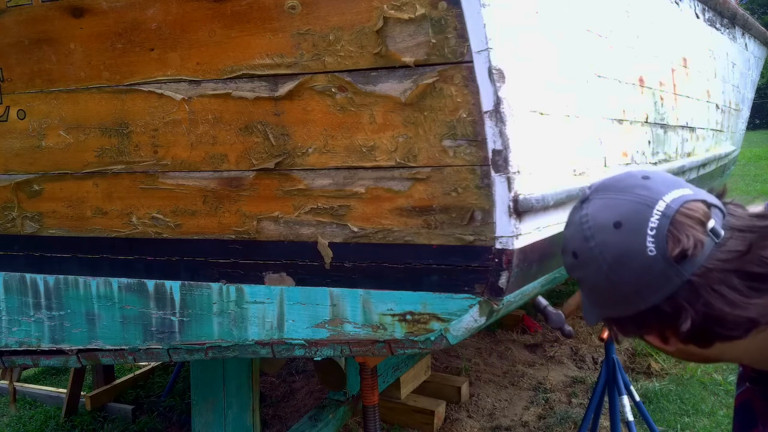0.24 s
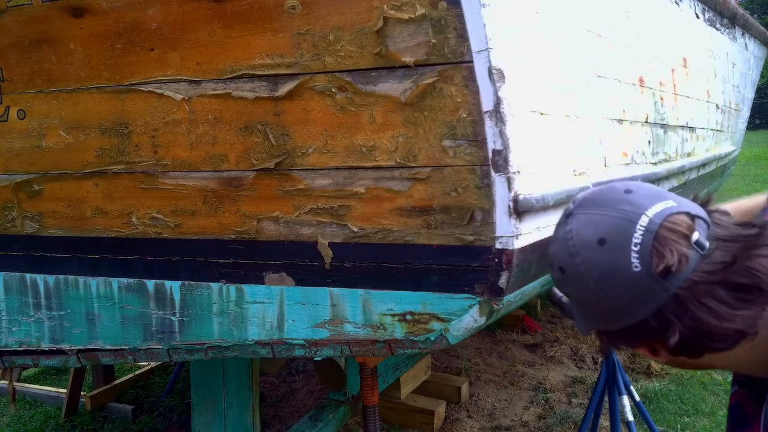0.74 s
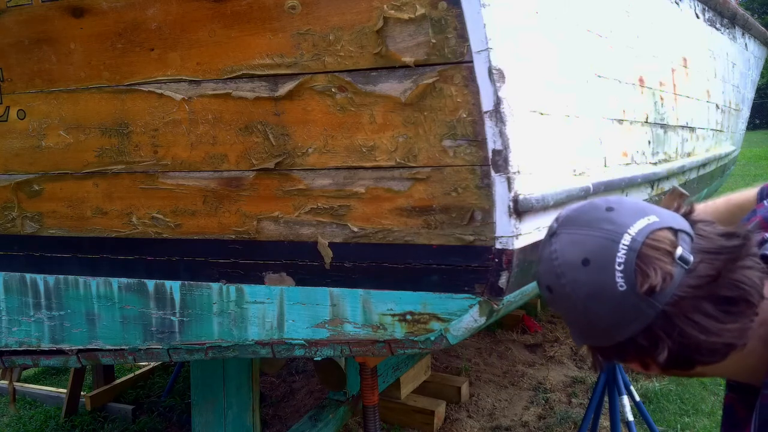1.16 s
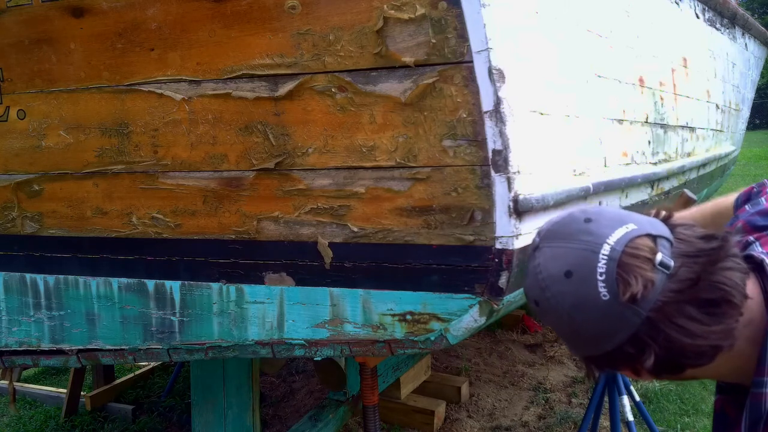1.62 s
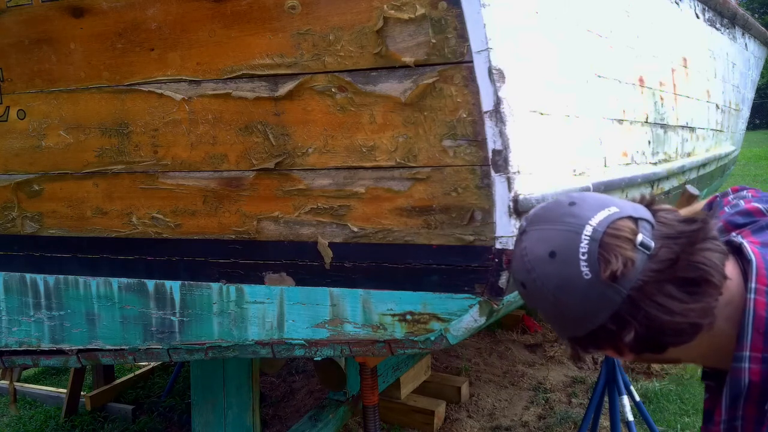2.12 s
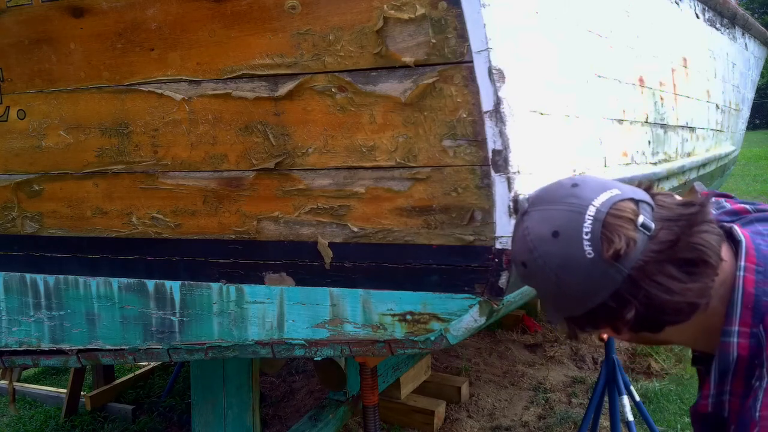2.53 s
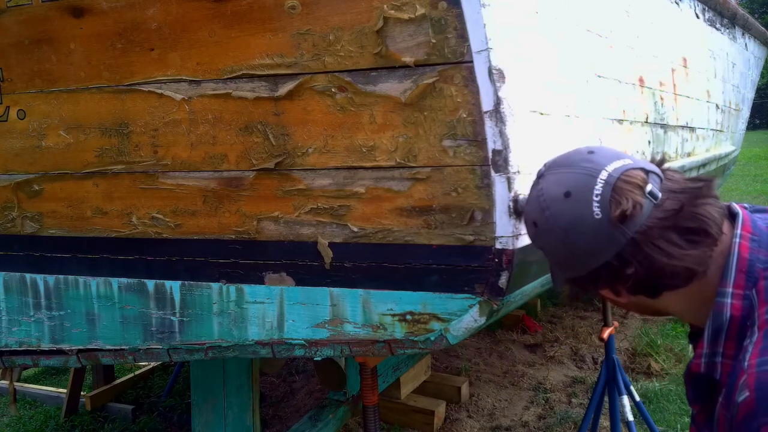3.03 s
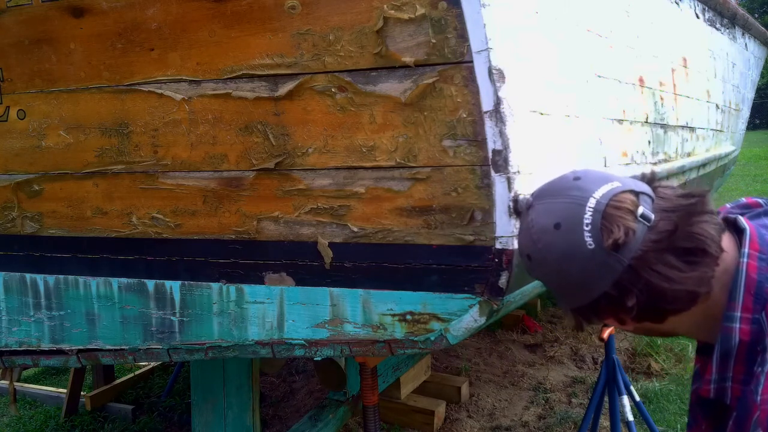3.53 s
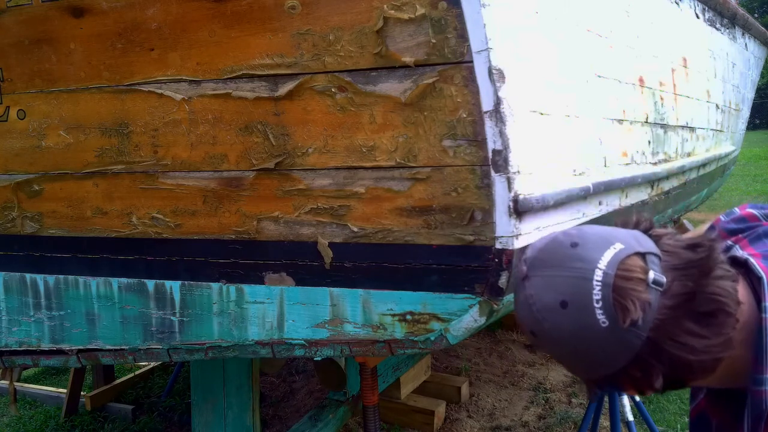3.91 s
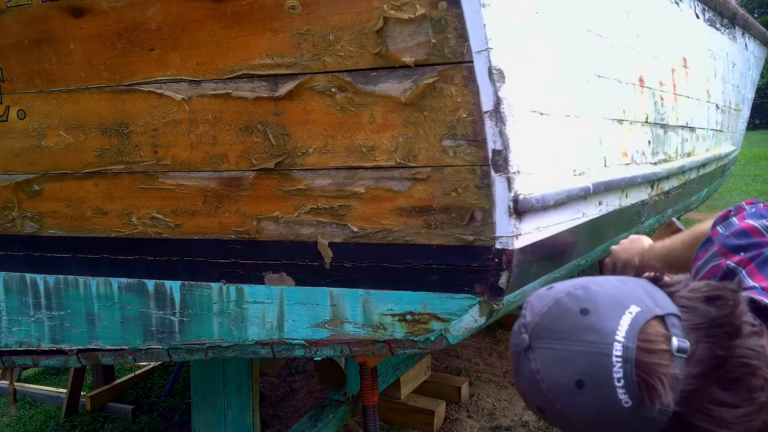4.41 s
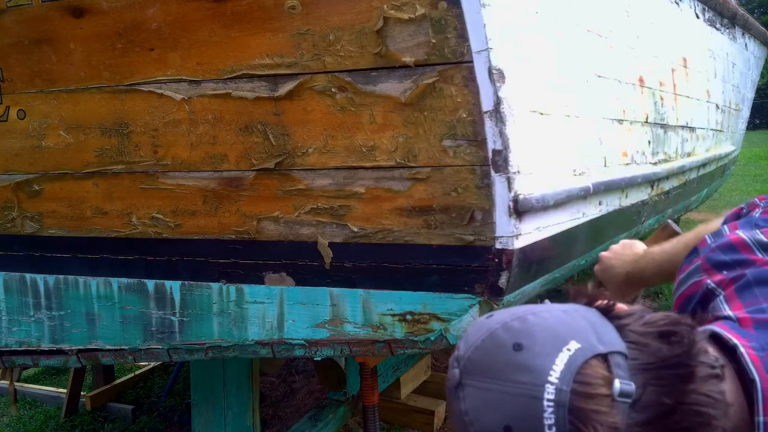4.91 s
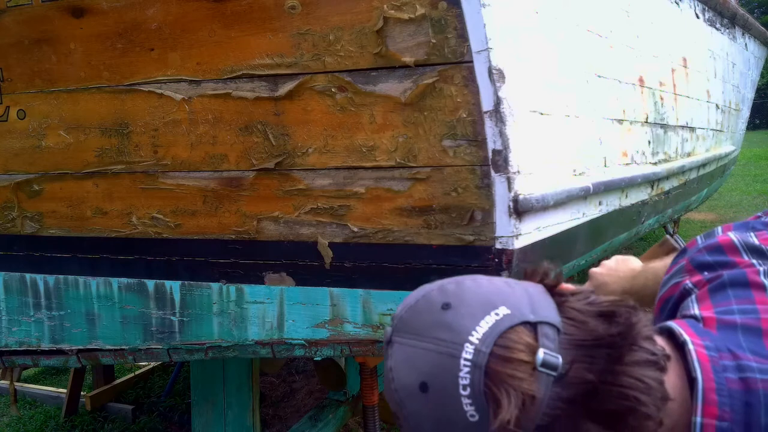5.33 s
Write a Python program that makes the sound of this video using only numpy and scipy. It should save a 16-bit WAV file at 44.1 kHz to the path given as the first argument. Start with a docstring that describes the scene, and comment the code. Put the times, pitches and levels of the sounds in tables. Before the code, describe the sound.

Outdoors in a boatyard, steady light hammer blows sound on a wooden hull, roughly four a second. Each gives a small crack and a brief woody ring that dies quickly. The taps grow a little stronger midway, soften briefly, then end brighter. A far bird gives faint falling whistles and thin chirps over soft rumble, insects and hiss. The sound sits entirely in the left channel.

```python
"""Boatyard: a small hammer taps the planks of a propped-up wooden hull, about four times a second.
Each tap rings the plank modes according to the spot struck, with a crack of steel on painted wood;
it reflects off the ground and dies away under the hull. Some taps bounce. A far bird whistles and
chirps through trees, over outdoor rumble, buzzing insects and hiss. Left channel only."""
import sys
import numpy as np
from scipy import signal
from scipy.fft import rfft, irfft
from scipy.io import wavfile

SR = 44100
rng = np.random.default_rng(int(sys.argv[2]) if len(sys.argv) > 2 else 0)


def wav_out(sig):
    """Save sig, one row per channel (or a flat mono array), as 16-bit PCM at SR to the path in sys.argv[1]."""
    wavfile.write(sys.argv[1], SR, np.round(np.clip(np.atleast_2d(sig).T, -1, 1) * 32767).astype(np.int16))


N = 245284

# distant rumble and rustle: f/Hz, relative density/dB
OUTDOOR_SPECTRUM = [(13, -52), (22, -11), (108, -4.5), (234, 1), (312, 0.5), (388, -11.5), (459, -8.5),
                    (598, -12.5), (708, -14.5), (1120, -17), (1460, -24.5), (2310, -26), (2800, -27),
                    (7000, -33), (9100, -38.5), (15400, -120)]
# insect chorus: f/Hz, relative density/dB
INSECT_SPECTRUM = [(6000, -54), (7100, -20), (7600, -6), (7950, -4), (8250, -8.5), (8700, -22), (9800, -21)]
# taps: t/s, knock strength/dB, brightness/(dB/oct) (square blow bright, glancing dull), crack/dB
HAMMER_TAPS = [(0.091, 1.2, 5.5, -36.5), (0.357, 0.7, 2.95, -44), (0.6072, -2.4, 0.9, -45.5),
               (0.8596, 0.7, 3.5, -40), (1.1119, 0.3, 1, -41.5), (1.3654, -1, -1.45, -41.5),
               (1.6, 1.8, -0.3, -40.5), (1.8535, -0.5, -0.3, -42), (2.1153, 4, 1.1, -40.5),
               (2.376, 4, 1, -40), (2.624, 4.5, 2.5, -42.5), (2.916, 1.7, 1.5, -43),
               (3.1513, 3.5, -1.5, -36), (3.41, 5, 1, -36), (3.675, 3.3, 2, -39), (3.928, -0.2, 3, -43.5),
               (4.1674, 0.3, 3.5, -42), (4.3748, -1.5, 1.3, -41), (4.6295, -7, -1.5, -48.5),
               (4.8794, -3, 0.8, -43.5), (5.1164, -1.2, 5.5, -40), (5.3583, 0.3, 6, -37.5)]
# hammer's path along the planks and back: t/s, spot/(0-4)
HAMMER_PATH = [(.09, .5), (.86, .12), (1.11, 1.58), (2.38, 3.29), (3.15, 3.96), (3.68, 4.17), (4.63, 2.2),
               (5.12, 0.84), (5.36, 0.65)]
# plank modes: nominal f/Hz, t60/s before wood losses, relative level/dB at spots 0, 1, 2, 3, 4
HULL_MODES = [(136, 0.32, -30, -47, -31.5, -27.5, -34), (172.6, 0.37, -30, -14, -32.5, -31, -45),
              (228.5, 0.283, -22, -19, -22, -22, -28), (244.8, 0.072, -39, -86, -16.5, -16.5, -12),
              (300.8, 0.217, -20, -17, -18, -28, -22.5), (345, 0.22, -13, -43, -44, -26, -25),
              (368.4, 0.25, -21, -14, -20, -27, -40.5), (397.7, 0.15, -23.5, -19, -25, -31, -29),
              (457.5, 0.21, -20.5, -20, -35.5, -44, -25.5), (502.6, 0.16, -33.5, -38, -14, -54, -37),
              (518, 0.15, -43, -32.5, -50, -40, -26), (638, 0.15, -72.5, -25.5, -29, -31.5, -27),
              (712, 0.14, -32.5, -35, -27, -42, -26.5), (814.5, 0.22, -59, -67, -48, -58, -23),
              (840, 0.15, -46, -30, -42.5, -48, -48), (910, 0.11, -29, -66.5, -19, -31, -74),
              (1037, 0.16, -49.5, -29.5, -24, -53, -27.5), (1170, 0.12, -37, -38, -18.5, -59, -31.5),
              (1313, 0.13, -45, -35.5, -3, -61.5, -36)]
# steel on painted wood: f/Hz, relative density/dB
CRACK_SPECTRUM = [(900, -1), (1500, 13), (2100, 4.5), (2700, -1), (3600, 0), (4500, -6), (5500, -13),
                  (6500, -29.5), (9000, -50), (12500, -9), (14500, -26)]
# yard scatter by octave band: f/Hz, gain/dB, t60/s
YARD_BANDS = [(126.4, -8.5, 0.1), (243, -17.5, .34), (481, -17, 0.22), (1070, -24, 0.28),
              (2000, -16.5, 0.24), (4000, -15.5, 0.69), (8000, -18, .2)]
# hammer head drops back on the plank: t/s, knock strength/dB re the tap before
HAMMER_BOUNCES = [(0.145, -14), (0.399, -9.5), (0.649, -8.5), (1.653, -15.5), (1.902, -10.5), (3.1888, -18)]
# thin rising chirps: t/s, relative level/dB
BIRD_CHIRPS = [(0.432, -61), (2.499, -64), (4.61, -70)]
# whistles that hold, then fall: t/s, top f/Hz, relative level/dB
BIRD_WHISTLES = [(.56, 3503, -65), (1.29, 3570, -62.5), (2.749, 3370, -66), (4.44, 3386, -66)]

TAP_T_S = np.arange(SR // 2) / SR


def from_db(db):
    """Decibels to gain."""
    return 10 ** (np.asarray(db) / 20)


def unit_rms(x):
    """Scale to rms 1."""
    return x / np.sqrt(np.mean(x ** 2) + 1e-20)


def butter(x, hz, kind, order=2):
    """Causal Butterworth filter."""
    sos = signal.butter(order, np.clip(hz, 10, .45 * SR), kind, fs=SR, output="sos")
    return signal.sosfilt(sos, x)


def add(track, t_s, sound):
    """Mix sound into track from t_s on."""
    start = max(0, round(t_s * SR))
    track[start:start + len(sound)] += sound[:len(track) - start]


def delayed(x, delay_s):
    """Fractional delay, same length."""
    index = np.arange(len(x))
    return np.interp(index - delay_s * SR, index, x, left=0)


def decay(t60_s):
    """Envelope falling 60 dB in t60_s."""
    return np.exp(-np.log(1000) * TAP_T_S / t60_s)


def noise(spectrum, size):
    """Shaped noise, rms 1."""
    hz, level_db = np.transpose(spectrum)
    bins_hz = np.maximum(np.fft.rfftfreq(size, 1 / SR), 1)
    gain = from_db(np.interp(np.log(bins_hz), np.log(hz), level_db))
    return unit_rms(irfft(rfft(rng.standard_normal(size)) * gain, size))


def drift(rate_hz):
    """Slow random wander, rms 1."""
    return unit_rms(butter(rng.standard_normal(N + SR), rate_hz, "low")[SR:])


def background(outdoor_db=-50.5, wander_db=.6, insect_db=-67, throb_db=2, hiss_db=-67):
    """Far outdoor noise, throbbing insect chorus, even hiss."""
    outdoors = from_db(outdoor_db + wander_db * drift(10)) * noise(OUTDOOR_SPECTRUM, N)
    insects = from_db(insect_db + throb_db * drift(25)) * noise(INSECT_SPECTRUM, N)
    return outdoors + insects + from_db(hiss_db) * rng.standard_normal(N)


def planks(spot, tilt_db_oct, contact_hz, hollow_t60_s=.038, baffle_hz=183, stiffening=.011, detune=.022):
    """Hull modes weighted by the spot struck, plus a short hollow note from the wood under the hammer."""
    # wood stiffens with spot: hollow note higher and fainter; a square blow makes it louder
    hollow_hz = 670 + 75 * spot
    hollow_db = -27 - .5 * spot + 2 * tilt_db_oct
    modes = np.array(HULL_MODES)
    mode_hz, mode_t60_s, spot_db = modes[:, 0], modes[:, 1], modes[:, 2:]
    spot = np.clip(spot, 0, 4)
    nearness = np.maximum(0, 1 - abs(spot - np.arange(5)))
    mode_db = spot_db @ nearness + tilt_db_oct * np.log2(mode_hz / 400)
    level_db = np.append(mode_db, hollow_db) + .24
    tuning = 1 + stiffening * spot + detune * rng.standard_normal(len(modes))   # no two blows alike
    hz = np.append(mode_hz * tuning, hollow_hz)
    wood_loss_t60_s = .075 * (300 / hz) ** .2
    t60_s = np.minimum(np.append(.98 * mode_t60_s, hollow_t60_s), wood_loss_t60_s)
    rings = decay(t60_s[:, None]) * np.cos(2 * np.pi * hz[:, None] * TAP_T_S)
    swing = -from_db(level_db) @ rings   # plank is pushed away first
    dulled = butter(swing, contact_hz, "low", order=6)   # wood yields
    return butter(dulled, baffle_hz, "high", order=4)   # long waves radiate poorly


def bending(x, hz, width_hz):
    """All-pass dispersion: bending-wave speed depends on frequency, so the first swing spreads."""
    radius = np.exp(-np.pi * width_hz / SR)
    poles = np.array([1, -2 * radius * np.cos(2 * np.pi * hz / SR), radius ** 2])
    return signal.lfilter(poles[::-1], poles, x)


def frames(x, first_s=.002876, span_s=.016, return_db=-6.5):
    """Add a dense clump of returns from nearby frames and plank ends."""
    paths = rng.standard_normal(len(TAP_T_S)) * np.exp(-(TAP_T_S / span_s) ** 4)
    returns = signal.fftconvolve(x, paths / np.linalg.norm(paths))[:len(x)]
    return x + from_db(return_db) * delayed(returns, first_s)


def crack(tilt_db_oct, decay_s, tail_gain, rise_s=.00059, tail_s=.012, tick_hz=(15075, 15525), tick_db=-8):
    """Steel on paint: bright burst, splintery tail, thin high tick."""
    attack = 1 - np.exp(-(TAP_T_S / rise_s) ** 2)
    release = np.exp(-TAP_T_S / decay_s) + tail_gain * np.exp(-TAP_T_S / tail_s)
    tick = unit_rms(butter(rng.standard_normal(len(TAP_T_S)), tick_hz, "band"))
    spectrum = [(hz, db + tilt_db_oct * min(np.log2(hz / 4000), 0)) for hz, db in CRACK_SPECTRUM]
    return attack * release * (noise(spectrum, len(TAP_T_S)) + from_db(tick_db) * tick)


def blow(strength_db, spot, tilt_db_oct, contact_hz, crack_db, lag_s=.0006, ground_s=.0053):
    """One blow and its ground reflection, the sharper of the two: the hull shades the direct treble."""
    swing = planks(spot, tilt_db_oct, contact_hz)
    swing = bending(swing, hz=520, width_hz=420)
    swing = bending(swing, hz=202, width_hz=166)   # longest waves arrive last
    knock = from_db(strength_db) * frames(swing)
    sharp_db_oct = .55 * (crack_db + 42)   # louder crack, sharper
    direct_crack = from_db(crack_db + 9) * crack(sharp_db_oct, decay_s=.00096, tail_gain=.33)
    ground_crack = from_db(crack_db + 12) * crack(sharp_db_oct, decay_s=.0013, tail_gain=.092)
    direct = knock + delayed(direct_crack, lag_s)
    reflected = .1 * butter(knock, 500, "high", order=1) + delayed(ground_crack, lag_s)
    return direct + delayed(reflected, ground_s)


def hammer():
    """Taps along the hull; a bounce is a softer, duller blow on the same spot."""
    out = np.zeros(N)
    path_s, path_spot = np.transpose(HAMMER_PATH)
    for t_s, strength_db, tilt_db_oct, crack_db in HAMMER_TAPS:
        spot = np.interp(t_s, path_s, path_spot)
        contact_hz = 800 + 36.3 * tilt_db_oct + 21.5 * spot   # square blow, stiff wood: shorter contact
        add(out, t_s, blow(strength_db, spot, tilt_db_oct, contact_hz, crack_db))
    for t_s, drop_db in HAMMER_BOUNCES:
        tap_s, strength_db, tilt_db_oct, _ = [tap for tap in HAMMER_TAPS if tap[0] < t_s][-1]
        spot = np.interp(tap_s, path_s, path_spot)
        add(out, t_s, blow(strength_db + drop_db, spot, tilt_db_oct, contact_hz=720, crack_db=-57.5))
    return out


def yard(x, first_s=.025, build_s=.006, echo_s=.038, echo_db=-21, echo_hz=620):
    """Scatter from hull, props and ground, plus one dull echo from further off."""
    tail = 0
    for hz, gain_db, t60_s in YARD_BANDS:
        band = butter(rng.standard_normal(len(TAP_T_S)), [hz / np.sqrt(2), hz * np.sqrt(2)], "band")
        envelope = (1 - np.exp(-TAP_T_S / build_s)) * decay(t60_s)
        tail = tail + from_db(gain_db) * band * envelope / np.linalg.norm(envelope)
    echo = from_db(echo_db) * delayed(butter(x, echo_hz, "low"), echo_s)
    return signal.fftconvolve(x, delayed(tail, first_s))[:len(x)] + echo


def bird(chirp_s=.02, whistle_s=.29, hold_s=.075, fall_hz_per_s=1900, waver=.0089, flutter_db=3.5):
    """Gliding, nearly pure notes, unsteady in pitch and level."""
    chirp_hz = np.linspace(6080, 7960, int(chirp_s * SR))
    fall_hz = fall_hz_per_s * np.maximum(np.arange(int(whistle_s * SR)) / SR - hold_s, 0)
    notes = [(t_s, top_hz - fall_hz, level_db) for t_s, top_hz, level_db in BIRD_WHISTLES]
    notes += [(t_s, chirp_hz, level_db) for t_s, level_db in BIRD_CHIRPS]
    out = np.zeros(N)
    wobble = 1 + waver * drift(63)
    for t_s, glide_hz, level_db in notes:
        hz = glide_hz * wobble[int(t_s * SR):][:len(glide_hz)]
        tone = signal.windows.tukey(len(hz), .3) * np.sin(2 * np.pi * np.cumsum(hz) / SR)
        add(out, t_s, from_db(level_db) * unit_rms(tone))
    return out * from_db(flutter_db * drift(10))


def trees(x, t60_s=1.8, gain_db=-3):
    """Direct sound and its smear through the trees, in equal parts."""
    paths = rng.standard_normal(len(TAP_T_S)) * decay(t60_s)
    smear = signal.fftconvolve(x, paths / np.linalg.norm(paths))[:N]
    return from_db(gain_db) * (x + smear)


def scene():
    """All sources left; right silent."""
    taps = hammer()
    left = taps + yard(taps) + trees(bird()) + background()
    return np.array([left, np.zeros(N)])


def record(dry):
    """Steep low-pass at 15.9 kHz."""
    return signal.sosfilt(signal.ellip(10, .2, 80, 15900, fs=SR, output="sos"), dry)


dry = scene()
out = record(dry)
wav_out(out)
```